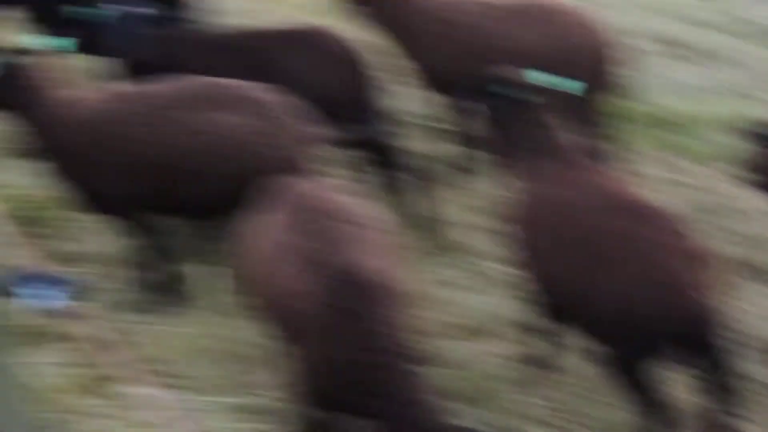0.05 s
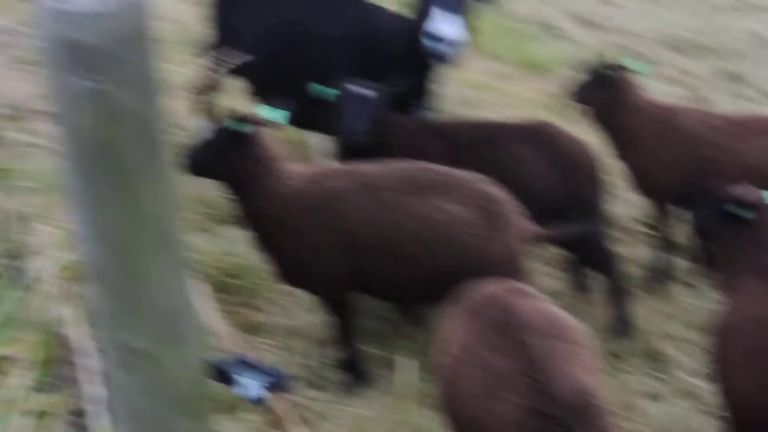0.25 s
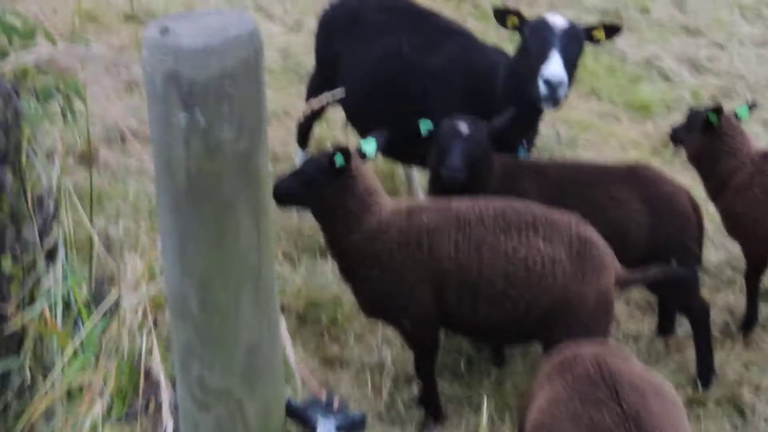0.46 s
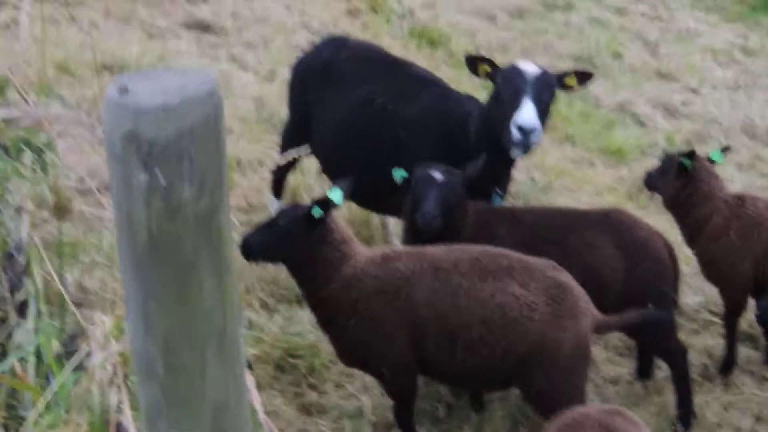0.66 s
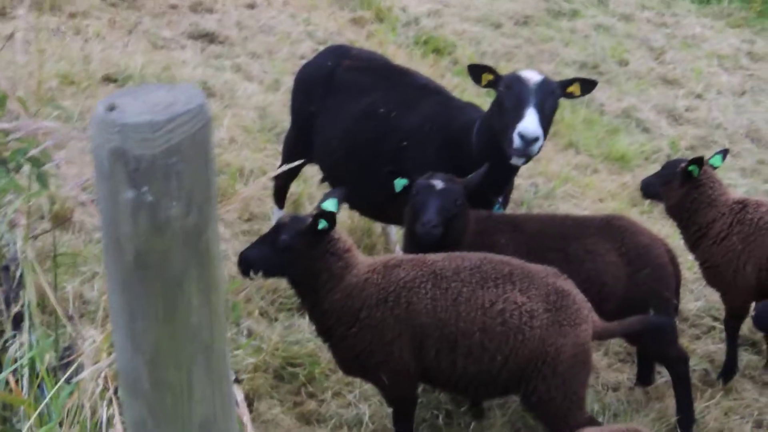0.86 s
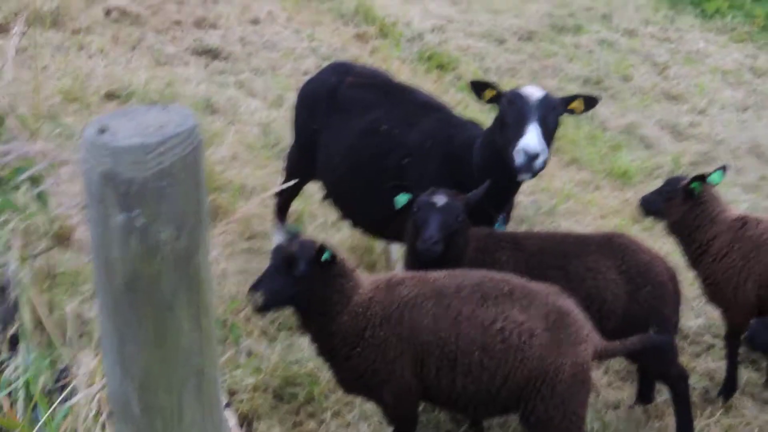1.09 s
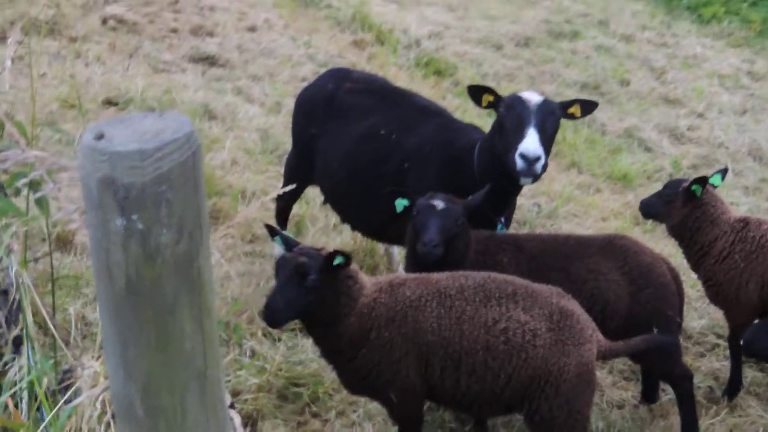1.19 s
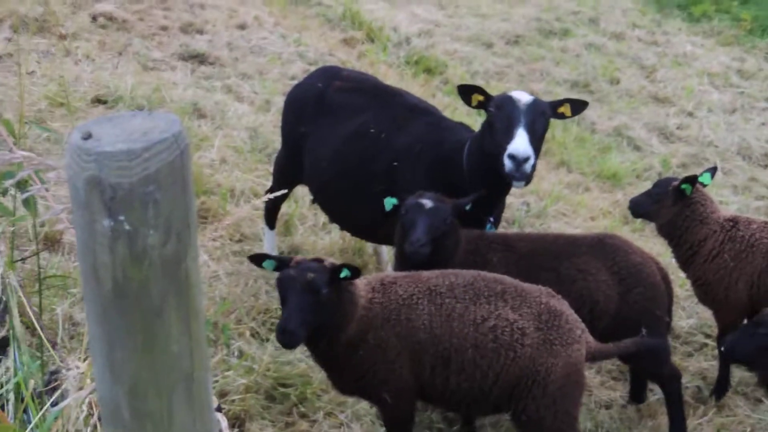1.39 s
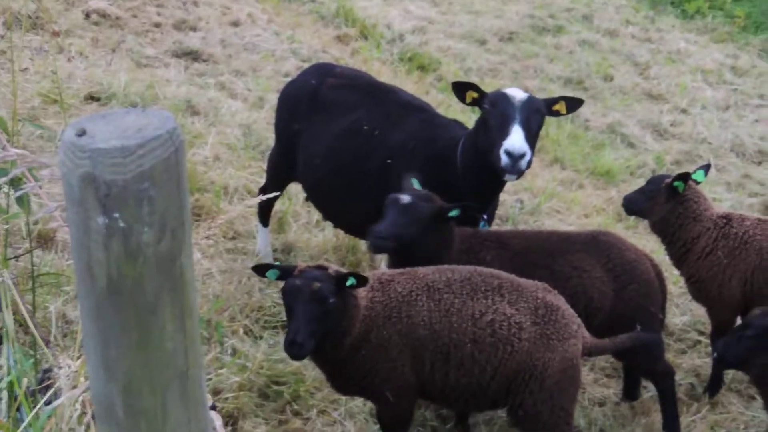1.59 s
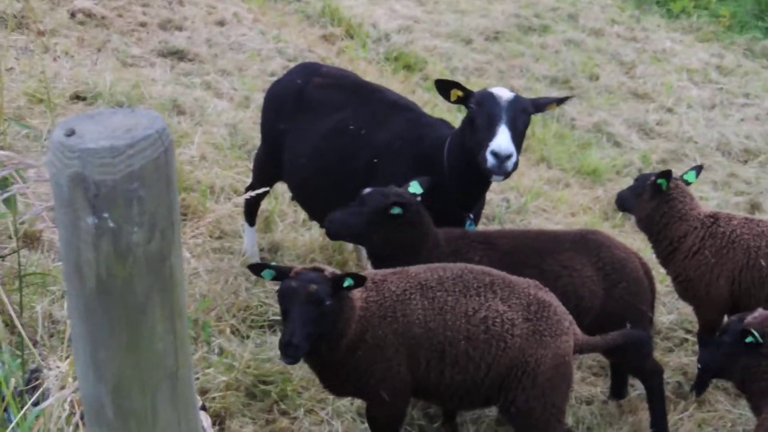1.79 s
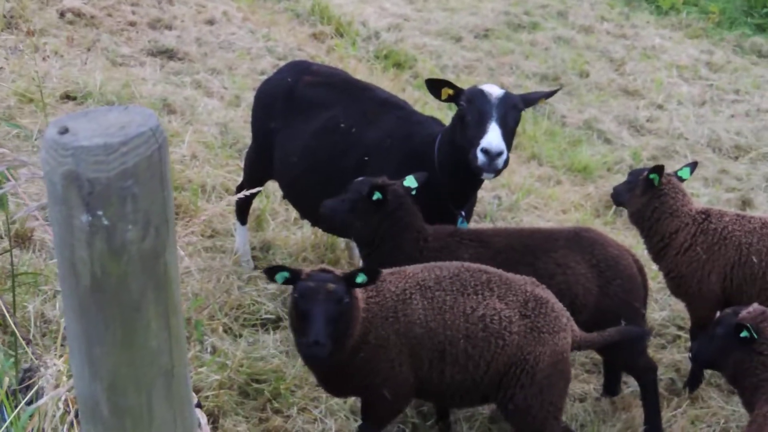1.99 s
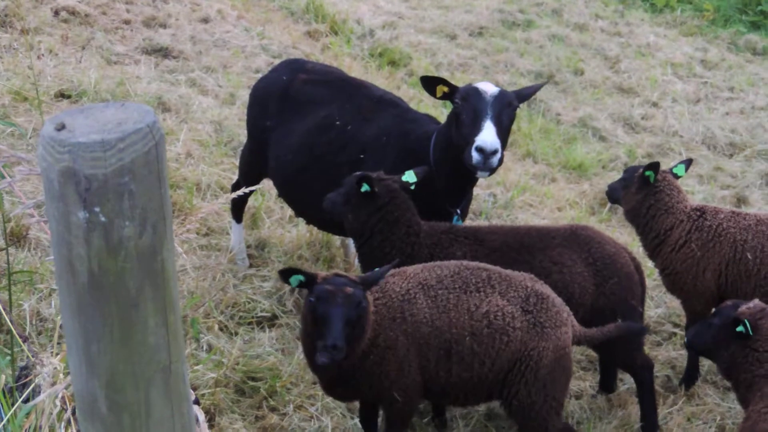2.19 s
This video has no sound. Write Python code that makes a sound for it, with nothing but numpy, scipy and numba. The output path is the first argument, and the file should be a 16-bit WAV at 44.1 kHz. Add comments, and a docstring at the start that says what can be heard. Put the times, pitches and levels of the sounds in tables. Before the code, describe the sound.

A near sheep gives a long low bleat and another replies with a shaky, fluttering one

```python
"""Open pasture: two sheep, heard in stereo through an automatic gain control.
A near ewe on the left gives a long, low, steady bleat; another on the right answers with a quavering one.
Voices are airflow pulses through parallel resonances; hiss is noise puffed out at each cycle.
Wind is banded stereo noise, the far hum two wavering sines, the faint bird a gliding sine,
and the grass ticks are impulses through resonators."""
import sys
import numpy as np
from scipy import signal
from scipy.fft import rfft, irfft, next_fast_len
from scipy.io import wavfile
from scipy.ndimage import uniform_filter1d
from numba import njit

SR = 44100
rng = np.random.default_rng(int(sys.argv[2]) if len(sys.argv) > 2 else 0)


def to_linear_factor(level_db):
    """Convert decibel levels (scalar or array-like) to linear amplitude factors."""
    exponent = np.asarray(level_db, float) / 20
    return 10 ** exponent


def unload_audio(sound):
    """Save the sound as a 16-bit wav file, at the path given as the first command line argument."""
    columns = np.transpose(np.atleast_2d(sound))
    # keep every value between -1 and 1, then stretch to whole-number steps
    steps = np.round(np.clip(columns, -1, 1) * 32767)
    wavfile.write(sys.argv[1], SR, steps.astype(np.int16))


N = 99225

# Wind spectrum: (frequency [Hz], relative density [dB])
AIR_SPECTRUM = [(20, 0), (82, -8.5), (125, -16.5), (160, 3.5), (200, -19.5), (304, -9), (401, -18),
                (1950, -28.5), (3130, -37), (5160, -37.5), (13600, -41.5), (15200, -69)]
# Left-right likeness of the wind: (frequency [Hz], likeness [0-1])
AIR_LIKENESS = [(60, 0.79), (240, 0.99), (940, 0.63), (3730, 0), (14800, 0.1)]
# Far hum: (mean frequency [Hz], median amplitude [dB])
HUM_TONES = [(78, -56.5), (156, -57.5)]

# Steady bleat, folds: (time [s], pitch [Hz], drive level [dB])
STEADY_VOICE = [(0.235, 90.15, -24.5), (0.27, 97.66, -21.5), (0.3, 102.9, -17), (0.344, 111.1, -17),
                (0.402, 116.3, -15), (0.484, 127.9, -14.5), (0.584, 136.6, -15.5), (0.67, 131.9, -16),
                (0.73, 137.8, -16.5), (0.809, 136.3, -18.5), (0.866, 133.2, -19), (0.996, 134.5, -20),
                (1.024, 131.6, -20.5), (1.112, 133.5, -21), (1.246, 128.8, -17.5), (1.329, 127.6, -17.5),
                (1.382, 121, -18.5), (1.419, 114, -23), (1.467, 101.4, -21.5), (1.519, 100, -36)]
# Creaky pulses before the voice settles: (end time [s], relative level [dB])
CREAKS = [(0.175, -49), (0.198, -47), (0.205, -30), (0.219, -32.5), (0.23, -27.5)]
# Near ewe's throat and mouth at scale 1: (centre [Hz], width [Hz], gain [dB])
STEADY_THROAT = [(214, 456, -14.5), (709.6, 83, 5), (1366.7, 71, 13.5), (2151, 211, 0.5), (3300, 76, -37)]
# Near ewe's mouth: (time [s], throat scale [ratio], gain above the first resonance [dB],
# top resonance [Hz], further gain of the top resonance [dB])
MOUTH = [(0.17, 0.9, 1.5, 3300, 2), (0.24, 0.87, -6, 3300, -6), (0.29, 0.89, 0, 2820, -7),
         (0.34, 0.95, 3, 2420, -2), (0.42, 1.018, 1.5, 2383, -1), (0.55, 0.96, -1, 2480, -5),
         (0.72, 0.99, 0.5, 2544, 0), (1.12, 0.985, 1, 2570, -1.5), (1.3, 0.95, -2, 2580, -3),
         (1.482, 0.98, -0.5, 2580, -2.5), (1.492, 1.27, -11, 2340, 2)]
# Extra rise of the second throat resonance: (time [s], scale [ratio])
SECOND_RESONANCE_LIFT = [(0.29, 1.0), (0.335, 1.08), (0.42, 1.05), (0.5, 1.0), (1.44, 1.0), (1.485, 1.12)]
# Hoarseness: (time [s], factor on jitter and shimmer [ratio])
HOARSENESS = [(0.235, 4), (0.29, 1.5), (1.36, 1), (1.49, 4)]
# Weaker snap inside each cycle: (time [s], share of the main snap [ratio])
SECOND_SNAP = [(0.235, 0.74), (0.3, 0.07)]
# Spells of long-short cycles: (time [s], swing [cycles])
LONG_SHORT = [(0.655, 0.006), (0.845, 0.01), (0.9, 0.005), (0.955, 0.007), (1.04, 0.011), (1.36, 0.01)]
# High hiss: (time [s], centre [Hz], level [dB])
HIGH_HISS = [(0.24, 10100, -59.5), (0.29, 9960, -46.5), (0.36, 9580, -46), (0.53, 8660, -51),
             (0.6, 9230, -62), (1.2, 9170, -64), (1.32, 9000, -62), (1.49, 9400, -69)]

# Quavers of the second bleat: (start [s], body level [dB], ring level above body [dB])
QUAVERS = [(1.399, -48, 3), (1.486, -41.5, 2), (1.562, -43.5, 4), (1.639, -42, 2.5), (1.738, -43, 7),
           (1.822, -40, 5), (1.912, -40.5, 6), (2.004, -48.5, 7.5)]
# One quaver: (share of its length [0-1], body offset [dB], ring offset [dB], pitch scale [ratio])
QUAVER_SHAPE = [(0.0, -4, -9, 0.95), (0.09, 7.5, -6, 0.99), (0.448, 7.5, -9.5, 0.97), (0.549, 5, 3, 0.96),
                (0.72, 2.5, -4, 0.87), (0.899, -5.5, -9.5, 0.83), (0.996, -7, -7.5, 0.93)]
# Pitch before the quaver's own scale: (time [s], pitch [Hz])
QUAVER_PITCH = [(1.6, 130), (1.77, 128.5), (1.85, 122.5), (1.95, 119), (2.03, 97.1)]
# Second sheep's throat: (centre [Hz], width [Hz], gain [dB])
QUAVER_THROAT = [(330, 400, -11.5), (574, 79, 5), (1267, 120, 8), (1812, 123, 11), (2560, 930, -5),
                 (5660, 1900, -11.5), (11000, 920, -18)]
# Bright ring centre: (time [s], centre [Hz])
RING_CENTRE = [(1.6, 2064), (1.96, 2086), (2.0, 2310)]
# Bright ring width: (time [s], width [Hz])
RING_WIDTH = [(1.96, 120.3), (2.0, 303)]

# Port levels, left sheep: (frequency [Hz], left minus right [dB])
LEFT_BALANCE = [(60, 1.0), (110, 6.1), (200, 3), (380, 2.8), (690, 4.5), (1280, 0.96), (2360, 8.7),
                (4350, 3.5), (8020, 1.7), (14800, 11)]
# Port phases, left sheep: (frequency [Hz], lead of left [rad])
LEFT_PHASE = [(0, -0.5), (1550, 1.9), (2500, 1.58), (3790, 3.0), (7410, 8.5), (9300, 16.5), (12700, 18.5),
              (14500, 20.5)]
# Port levels, right sheep: (frequency [Hz], left minus right [dB])
RIGHT_BALANCE = [(60, 8), (110, -5), (200, -2), (380, -4), (690, -1.5), (1280, -6), (2360, -11), (4350, 4),
                 (8020, -6), (14800, 4)]
# Port phases, right sheep: (frequency [Hz], lead of left [rad])
RIGHT_PHASE = [(0, -1), (1210, 0.06), (1640, -1), (1980, -2.02), (3270, 1.62), (6630, 5), (7150, 2),
               (12300, 1.5), (13900, -5.5)]
# Ground and flock echoes: (delay [s], low-frequency level [dB])
ECHOES = [(0.004, -30.5), (0.019, -23), (0.043, -23)]

# Grass ticks: (time [s], relative level [dB], centre [Hz])
TICKS = [(2.134, -51, 4630), (2.145, -46, 6100), (2.207, -53, 6830)]
# Bird: (time [s], pitch [Hz], amplitude [dB])
BIRD = [(2.19, 2600, -80), (2.21, 2750, -67), (2.25, 3040, -66)]


def rms_one(x):
    """Scale to rms 1."""
    return x / np.sqrt(np.mean(x ** 2) + 1e-20)


def in_time(rows):
    """Table columns, interpolated linearly over time."""
    time_s, *columns = np.transpose(rows)
    return [np.interp(np.arange(N) / SR, time_s, column) for column in columns]


def over_log_hz(log_hz, rows):
    """Second table column, interpolated over log frequency."""
    hz, value = np.transpose(rows)
    return np.interp(log_hz, np.log(hz), value)


def gate(start_s, end_s):
    """1 between two times, with 1.2 ms edges inside them."""
    t = np.arange(N) / SR
    return np.clip(np.minimum(t - start_s, end_s - t) / 0.0012, 0, 1)


def drift(corner_hz):
    """Low-passed random wander of rms 1."""
    r = np.exp(-2 * np.pi * corner_hz / SR)
    noise = rng.standard_normal(N + SR)
    return rms_one(signal.lfilter([1], [1, -2 * r, r * r], noise)[SR:])


def butter(x, order, hz, kind):
    """Butterworth filter."""
    return signal.sosfilt(signal.butter(order, hz, kind, fs=SR, output="sos"), x)


def air():
    """Wind: half-octave bands of stereo noise, each flickering, less alike left and right in the treble."""
    level_db, flicker_db, flicker_hz = -49, 2, 5.2
    edges = 20 * 2 ** np.arange(0, 9.9, 0.5)
    # neighbouring bands use different noise
    white = rng.standard_normal((2, 2, N + SR // 4))
    out = 0
    for k, (low, high) in enumerate(zip(edges, edges[1:])):
        mid, side = butter(white[k % 2], 2, [low, high], "band")[:, -N:]
        log_hz = np.log(low * high) / 2
        alike = np.clip(over_log_hz(log_hz, AIR_LIKENESS), 0, 1)
        db = over_log_hz(log_hz, AIR_SPECTRUM) + flicker_db * drift(flicker_hz)
        pair = np.sqrt(1 + alike) * mid + np.sqrt(1 - alike) * side * [[1], [-1]]
        out = out + to_linear_factor(db) * pair
    return to_linear_factor(level_db) * rms_one(out)


def hum():
    """Far low sines, wavering in pitch and level."""
    pitch_waver, level_waver_db = 0.022, 3.9
    out = 0
    for hz, db in HUM_TONES:
        level = to_linear_factor(db + level_waver_db * drift(12))
        turns = np.cumsum(hz * (1 + pitch_waver * drift(3.1))) / SR
        out = out + level * np.sin(2 * np.pi * turns)
    return out


@njit
def two_pole(x, turn, r):
    """Resonator whose tuning may change at every sample."""
    y = np.zeros(len(x))
    for i in range(2, len(x)):
        y[i] = (1 - r[i] ** 2) / 2 * (x[i] - x[i - 2]) + turn[i] * y[i - 1] - r[i] ** 2 * y[i - 2]
    return y


def resonance(x, hz, width_hz):
    """Resonator with gain 1 at its centre."""
    r = np.exp(-np.pi * width_hz / SR) + np.zeros(N)
    return two_pole(x, 2 * r * np.cos(2 * np.pi * hz / SR), r)


def throat(x, table, scale=1):
    """Parallel resonances, signs alternating."""
    return sum((-1) ** k * to_linear_factor(db) * resonance(x, hz * scale, width_hz)
               for k, (hz, width_hz, db) in enumerate(table))


def folds(hz, open_share, jitter, shimmer_db, breath_db, limp=0):
    """Airflow slope, swelling as the folds part and snapping off as they shut; and cycles since the snap."""
    # 4x oversampled
    fine_hz = np.repeat(hz * (1 + jitter * drift(60)), 4)
    turns = np.cumsum(fine_hz / (4 * SR))
    swing = np.repeat(limp + np.zeros(N), 4) * np.cos(np.pi * turns)
    cycle = (turns + swing) % 1
    u = np.clip(1 - (1 - cycle) / np.clip(open_share, 0.1, 0.95), 0, 1)
    slope = (2 * u - 3 * u * u).reshape(N, 4).mean(axis=1)
    cycle = cycle[::4]
    breath = to_linear_factor(breath_db) * rng.standard_normal(N) * np.exp(-cycle / 1.1)
    return (slope + breath) * to_linear_factor(shimmer_db * drift(42)), cycle


def ports(x, balance, phase):
    """Adds dull echoes, then splits level and phase between the two microphone ports."""
    size = next_fast_len(N + SR // 4)
    hz = np.arange(size // 2 + 1) * SR / size + 1e-3
    echoes = sum(to_linear_factor(db) * np.exp(-2j * np.pi * hz * s) for s, db in ECHOES)
    paths = 1 + echoes / (1 + 1j * hz / 3000)
    half = to_linear_factor(over_log_hz(np.log(hz), balance) / 2)
    half = half * np.exp(0.5j * np.interp(hz, *np.transpose(phase)))
    return irfft(rfft(x, size) * paths * np.array([half, 1 / half]), size)[:, :N]


def steady_source():
    """Near ewe's fold pulses, each with a weaker second snap, after a few lone creaks."""
    open_share, jitter, shimmer_db, breath_db = 0.568, 0.003, 0.5, -22
    wobble, wobble_hz, spell_s = 0.003, 12, 0.022
    second_lag_s, creak_s = 0.004732, 0.00362
    hz, db = in_time(STEADY_VOICE)
    hoarse, = in_time(HOARSENESS)
    second, = in_time(SECOND_SNAP)
    t = np.arange(N) / SR
    limp = sum(swing * np.exp(-((t - s) / spell_s) ** 2) for s, swing in LONG_SHORT)
    source, cycle = folds(hz * (1 + wobble * drift(wobble_hz)), open_share,
                          hoarse * jitter, hoarse * shimmer_db, breath_db, limp)
    on = gate(STEADY_VOICE[0][0], STEADY_VOICE[-1][0])
    source = source * on * to_linear_factor(db) / np.std(throat(source, STEADY_THROAT, in_time(MOUTH)[0]))
    source = source + second * np.roll(source, int(second_lag_s * SR))
    u = np.linspace(0, 1, int(creak_s * SR))
    for end_s, creak_db in CREAKS:
        end = int(end_s * SR)
        source[end - len(u):end] += to_linear_factor(creak_db) * 10 * (2 * u - 3 * u * u)
    return source, cycle, on


def steady_mouth(source):
    """Near ewe's moving throat and mouth resonances, dulled by a low-pass."""
    top_width_hz, cut_hz = 165, 3000
    scale, upper_db, top_hz, top_db = in_time(MOUTH)
    lift, = in_time(SECOND_RESONANCE_LIFT)
    upper = source * to_linear_factor(upper_db)
    first = throat(source, STEADY_THROAT[:1], scale)
    second = throat(upper, STEADY_THROAT[1:2], scale * lift)
    higher = throat(upper, STEADY_THROAT[2:], scale)
    top = resonance(upper * to_linear_factor(top_db), top_hz, top_width_hz)
    return butter(second - higher - first - top, 2, cut_hz, "low")


def steady_hiss(cycle):
    """Noise puffed out at each snap, through high, low and broad resonances."""
    decay_cycles, high_width_hz = 0.53, 950
    low_hz, low_width_hz, low_start_db, low_fade_db_per_s = 6270, 1000, -63.5, 4
    broad_hz, broad_width_hz, broad_under_high_db = 4340, 1200, -3.5
    high_hz, high_db = in_time(HIGH_HISS)
    puffs = rng.standard_normal((2, N)) * np.exp(-cycle / decay_cycles)
    high = resonance(puffs[0], high_hz, high_width_hz)
    high = rms_one(resonance(high, high_hz, high_width_hz))
    low = resonance(puffs[1], low_hz, low_width_hz)
    low = rms_one(resonance(low, low_hz, low_width_hz))
    broad = rms_one(resonance(puffs[1], broad_hz, broad_width_hz))
    low_db = low_start_db - low_fade_db_per_s * np.arange(N) / SR
    return to_linear_factor(high_db) * (high + to_linear_factor(broad_under_high_db) * broad) + to_linear_factor(low_db) * low


def steady_bleat():
    """Near ewe: fold pulses through throat and mouth, plus hiss on every snap."""
    source, cycle, on = steady_source()
    return steady_mouth(source) + on * steady_hiss(cycle)


def quavering_bleat():
    """Second sheep: each quaver opens full, turns bright, then sinks in level and pitch."""
    open_share, jitter, shimmer_db, breath_db = 0.274, 0.014, 1.5, -19
    end_s, ring_gain_db, low_cut_hz = 2.03, 20.5, 447
    starts, levels_db, brights_db = np.transpose(QUAVERS)
    gaps = np.diff(starts)
    lengths = np.append(gaps, np.mean(gaps))
    rows = []
    for start, length, db, bright_db in zip(starts, lengths, levels_db, brights_db):
        for share, body, ring, scale in QUAVER_SHAPE:
            rows.append((start + share * length, db + body, db + bright_db + ring, scale))
    body_db, ring_db, pitch_scale = in_time(rows)
    hz, = in_time(QUAVER_PITCH)
    source, _ = folds(hz * pitch_scale, open_share, jitter, shimmer_db, breath_db)
    source = source * gate(starts[0], end_s) / np.std(throat(source, QUAVER_THROAT))
    body = throat(source * to_linear_factor(body_db), QUAVER_THROAT)
    ring = resonance(source * to_linear_factor(ring_db + ring_gain_db), in_time(RING_CENTRE)[0], in_time(RING_WIDTH)[0])
    return butter(body + ring, 4, low_cut_hz, "high")


def ticks():
    """Dry stalks snap softly: impulses through resonators."""
    width_hz = 970
    out = 0
    for s, db, hz in TICKS:
        impulse = 1.0 * (np.arange(N) == int(s * SR))
        out = out + to_linear_factor(db) * 10 * resonance(impulse, hz, width_hz)
    return out


def bird():
    """A thin whistle: a rising sine, lasting to the end."""
    hz, db = in_time(BIRD)
    return to_linear_factor(db) * gate(BIRD[0][0], 3) * np.sin(2 * np.pi * np.cumsum(hz) / SR)


def scene():
    """Near ewe left, second sheep right, the pasture around."""
    pasture = air() + hum()
    left = ports(steady_bleat(), LEFT_BALANCE, LEFT_PHASE)
    right = ports(quavering_bleat(), RIGHT_BALANCE, RIGHT_PHASE)
    return pasture + left + right + ticks() + bird()


def roll_off(x):
    """The treble ends steeply here."""
    return signal.sosfilt(signal.butter(12, 15380, fs=SR, output="sos"), x)


def record(dry):
    """Gain control lifts quiet moments and yields late to loud ones; peaks clip, then a low-pass."""
    boost_db, knee_db, squeeze_db_per_db = 10.5, -28.5, 0.72
    attack_s, release_db_per_s = 0.038, 9
    ceiling, stopband_hz = 0.92, 15300
    power = uniform_filter1d(np.mean(dry ** 2, axis=0), size=441)
    level_db = 10 * np.log10(power + 1e-12)
    # running maximum on a rising ramp: the cut falls no faster than the release
    climb_db = release_db_per_s * np.arange(N) / SR
    wanted_db = squeeze_db_per_db * np.maximum(level_db - knee_db, 0)
    cut_db = np.maximum.accumulate(wanted_db + climb_db) - climb_db
    r = np.exp(-1 / (attack_s * SR))
    late_cut_db = signal.lfilter([1 - r], [1, -r], cut_db)
    x = np.clip(dry * to_linear_factor(boost_db - late_cut_db), -ceiling, ceiling)
    x = signal.sosfilt(signal.cheby2(10, 50, stopband_hz, fs=SR, output="sos"), x)
    return roll_off(x)


dry = scene()
out = record(dry)
unload_audio(out)
```